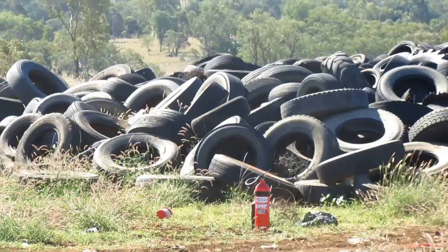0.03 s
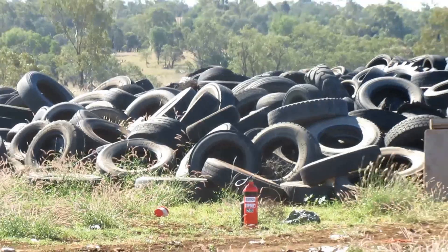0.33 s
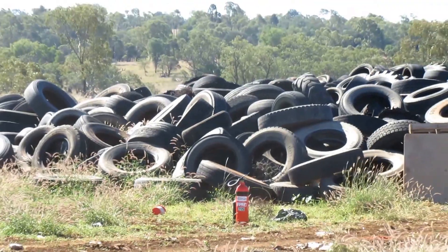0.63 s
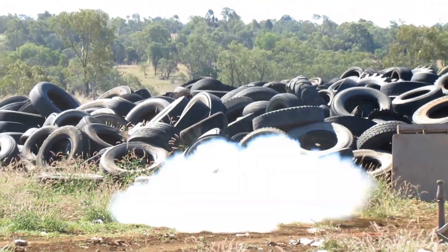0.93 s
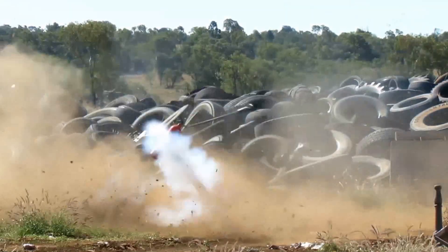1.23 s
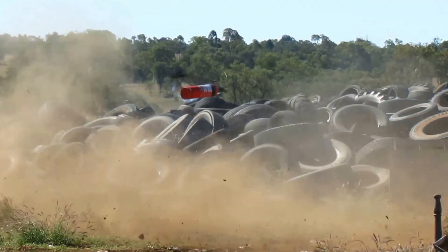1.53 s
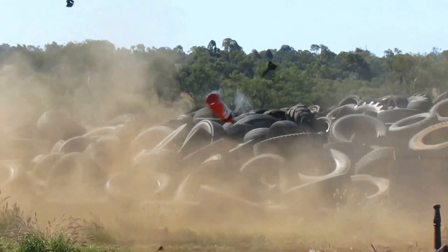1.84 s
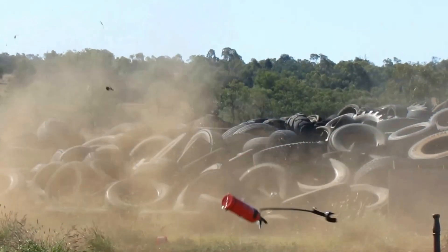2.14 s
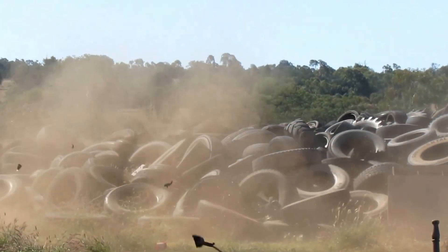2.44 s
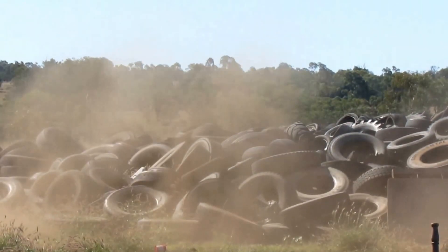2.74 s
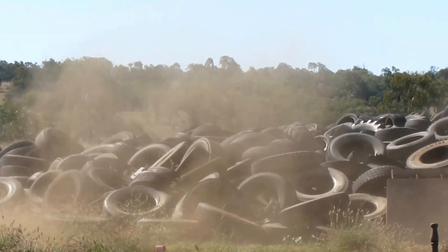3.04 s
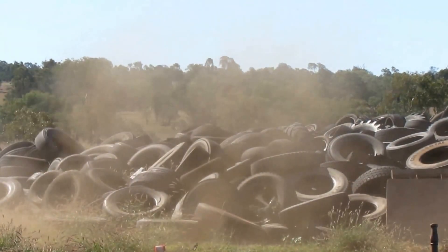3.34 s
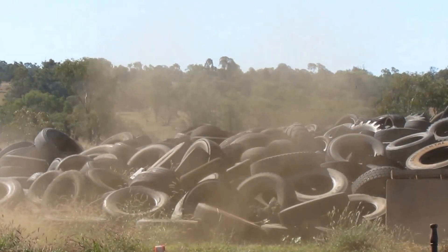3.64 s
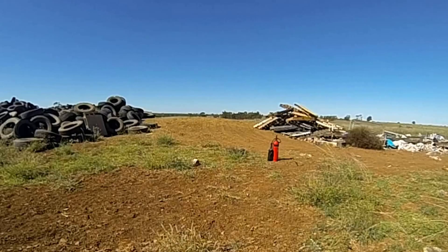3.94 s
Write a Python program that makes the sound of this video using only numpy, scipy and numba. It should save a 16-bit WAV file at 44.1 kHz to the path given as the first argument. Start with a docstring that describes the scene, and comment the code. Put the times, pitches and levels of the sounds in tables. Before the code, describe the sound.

A rifle cracks close to the microphone in an open field, over a small chugging engine. A distant fire extinguisher bursts, hisses in surges and clinks, and debris thuds down. Everything cuts off, leaving faint wind.

```python
"""Rifle shot bursts a fire extinguisher

A rifle cracks up close while a small single-cylinder engine chugs off to the right. The distant
extinguisher bursts, tumbles through the air on its hissing jet and clinks; debris thuds down.
The shot overloads the microphone and ducks its gain control, which recovers slowly.
Everything stops dead, and after a short silence there is only faint wind."""
import sys
import numpy as np
from scipy import signal
from scipy.fft import rfft, irfft
from scipy.io import wavfile
from numba import njit

SR = 44100
rng = np.random.default_rng(int(sys.argv[2]) if len(sys.argv) > 2 else 0)


def log_audio(samples):
    """Write samples as a 16-bit WAV file to the path given in sys.argv[1]."""
    # one column per channel
    frames = np.atleast_2d(samples).T
    # limit to full scale, then quantise
    limited = np.clip(frames, -1, 1)
    pcm = np.round(limited * 32767).astype(np.int16)
    wavfile.write(sys.argv[1], SR, pcm)


N = 176400
T = np.arange(N) / SR
HZ = np.maximum(np.fft.rfftfreq(N, 1 / SR), 1)
CYCLE_HZ = 25.52  # the engine's four-stroke cycles per second
SHOT_S = .9285


def undb(db):
    """Decibels to gain."""
    return 10 ** (np.asarray(db) / 20)


def unit(x):
    """Scale to rms 1."""
    return x / np.sqrt(np.mean(x ** 2))


def pan(db):
    """Left and right gains for a level difference; positive leans left."""
    return undb(np.array([db, -db]) / 2).reshape(2, -1)


def colour(points):
    """An EQ curve through (f/Hz, level/dB) points."""
    hz, db = np.array(points, float).T
    return undb(np.interp(np.log(HZ), np.log(hz), db))


def band(points):
    """An EQ curve that falls away steeply beyond its ends."""
    return colour(points) * np.minimum(1, np.minimum(HZ / points[0][0], points[-1][0] / HZ)) ** 4


def noise(spectrum, side):
    """Stereo noise of rms 1; the side gain sets its width."""
    mid, spread = rfft(rng.standard_normal((2, N)))
    return unit(irfft(spectrum * (mid + side * spread * np.array([[1], [-1]])), N))


def walk(hz):
    """Smooth random motion of rms 1, rolling off above hz."""
    return unit(irfft(rfft(rng.standard_normal(N)) * np.exp(-(HZ / hz) ** 2), N))


def decay(start, t60, hold=0):
    """Sudden onset, hold, then a fall of 60 dB in t60 seconds."""
    return (T >= start) * 1000. ** (-np.maximum(T - start - hold, 0) / t60)


def wave(start, hz, t60):
    """A strongly damped pressure oscillation."""
    return decay(start, t60) * np.sin(2 * np.pi * hz * (T - start))


def wind():
    """Faint air with one low gust on the microphone."""
    # spectra of the air and the gust: f/Hz, level/dB
    air_eq = [(20, -13), (40, -10), (70, -9), (350, -12), (700, -23), (1300, -29), (1450, -21), (1600, -27),
              (1850, -29), (2100, -51)]
    gust_eq = [(20, 9), (32, 0), (50, -17)]
    gust_s, gust_width_s = 3.85, .06
    swell = np.exp(-((T - gust_s) / gust_width_s) ** 2)
    gust = undb(-50) * swell * noise(band(gust_eq), side=undb(-27))
    return gust + undb(-61) * noise(band(air_eq), side=undb(-26))


def throb():
    """A short upward swoop in the engine's drone, once every fourth cycle."""
    first_s, width_s, centre_hz, rise_hz_per_s = .143, .03, 200, 1300
    period = 4 / CYCLE_HZ
    from_peak = (T - first_s + period / 2) % period - period / 2
    phase = 2 * np.pi * (centre_hz + rise_hz_per_s * from_peak / 2) * from_peak
    return undb(-30) * np.exp(-(from_peak / width_s) ** 2) * np.cos(phase)


def engine():
    """Exhaust drone, with clatter and ringing covers that swell at each firing; off to the right."""
    # exhaust harmonics: multiple of the cycle rate, level/dB
    harmonics = [(1, -13), (2, 0), (3, -12), (4, -14), (5, -8.5), (6, -8), (7, -15.5), (8, -14), (9, -21.5),
                 (10, -16), (11, -12), (12, -12), (13, -11), (14, -23), (15, -28), (16, -17.5), (17, -19.5),
                 (18, -25), (19, -17), (20, -19.5), (21, -23), (22, -22.5), (23, -13.5), (24, -21),
                 (25, -13), (26, -21), (27, -19.5), (28, -19.5)]
    # mechanical noise spectrum: f/Hz, level/dB
    clatter_eq = [(41, -33.5), (70, -3.5), (96, -5), (138, -7.5), (284, -7), (373, -17), (599, -10),
                  (840, -13), (1350, -15.5), (2030, -14.5), (2600, -18.5), (4580, -23), (6000, -32.5),
                  (8420, -34.5), (15500, -47)]
    # cover resonances: f/Hz, bandwidth/Hz, level/dB
    cover_modes = [(613, 17, 1.5), (1612, 35, -2), (2041, 66, -0.5)]
    # stereo width: f/Hz, side level/dB
    width = [(60, -16), (600, -28), (1400, 2), (3000, -5), (15000, 6)]
    # stereo position: f/Hz, left minus right/dB
    balance = [(60, -7), (200, -5), (600, -3), (1300, 1), (4400, -1), (15000, 0.5)]
    firing_s, depth, sharpness, crossover_hz, left_lag_s = .0131, 1.44, 1.9, 1204, .00018
    turn = 2 * np.pi * (CYCLE_HZ * (T - firing_s) + .0066 * walk(6))
    drone = unit(sum(undb(db) * np.cos(k * turn + (k > 2) * rng.uniform(0, 2 * np.pi))
                     for k, db in harmonics))
    strength = undb(3 * walk(33))  # no two firings hit alike
    pulse = unit(1 + depth * strength * np.exp(sharpness * (np.cos(turn) - 1)))
    clatter = noise(band(clatter_eq), colour(width))
    lows = irfft(rfft(clatter) / (1 + (HZ / crossover_hz) ** 2), N)
    clatter = lows + pulse * (clatter - lows)  # only the top end pulses
    resonances = sum(undb(db) / (1 + (2 * (HZ - hz) / bw) ** 2) for hz, bw, db in cover_modes)
    rattle = pulse * noise(resonances, colour(width))
    sound = undb(-27) * drone + throb() + undb(-27.5) * clatter + undb(-36.5) * rattle
    lean = np.sqrt(colour(balance))
    lag = np.exp(-2j * np.pi * HZ * left_lag_s)
    return irfft(rfft(sound) * np.array([lean * lag, 1 / lean]), N)


def debris():
    """Dull thuds of pieces landing on earth and rubber."""
    # landings: t/s, level/dB
    landings = [(2.275, -21), (2.891, -21), (2.96, -23.5)]
    # thud spectrum: f/Hz, level/dB
    thud_eq = [(25, -24), (110, -3.5), (250, -21), (800, -45), (3000, -39)]
    return noise(band(thud_eq), side=undb(3)) * sum(undb(db) * decay(s, t60=.26) for s, db in landings)


def clink():
    """Steel chatters against something hard, then rings on faintly."""
    # steel modes: f/Hz, level/dB, left minus right/dB, after-ring t60/s
    modes = [(1209, -1, 1.5, 0.49), (2445, -2.5, -8, 0.056), (2490, -8, -3, 0.15), (2710, -8, -7, 0.13),
             (3203, -3, -5, 0.21), (3237, -16, 1, 0.082), (4340, -17, -4, 0.061), (5100, -15.5, 6, 0.056),
             (5370, -8, 9, .05), (5700, -15, 14.5, .05), (5910, -12.5, 17, .05), (6020, -11, 8, .05),
             (8300, -22, 0, .04), (11800, -23, 3.5, .04)]
    hit_s, attack_s, roughness = 1.7165, .0012, .5
    chatter = decay(hit_s, t60=.03, hold=.024)
    scrape = undb(-26) * chatter * noise(band([(1000, -2), (12000, -5)]), side=undb(-2))
    ring = 0
    for hz, db, pan_db, t60 in modes:
        envelope = chatter * (1 + roughness * walk(91)) + undb(-7) * decay(hit_s, t60)
        phase = 2 * np.pi * hz * (T - hit_s) + roughness * hz / 3000 * walk(100)
        ring += undb(db - 10) * pan(pan_db) * envelope * np.sin(phase)
    return (scrape + ring) * np.clip((T - hit_s) / attack_s, 0, 1)


def jet():
    """Turbulent gas roars and hisses, surging whenever the tumbling bottle's nozzle swings this way."""
    # nozzle swings: t/s, flow level/dB, roar trim/dB
    swings = [(1.1, -30, -9), (1.124, -28.5, -13), (1.152, -23, -4.5), (1.216, -31, -8), (1.26, -33, -7),
              (1.296, -20.5, -1.5), (1.364, -36, -7.5), (1.38, -29.5, -7.5), (1.412, -36, 1),
              (1.468, -36, -10.5), (1.518, -26, -4), (1.572, -40, -7.5), (1.636, -62, -3), (1.66, -66, 4)]
    # spectra of the low roar and the high hiss: f/Hz, level/dB
    roar_eq = [(290, -19), (500, -6.5), (702, -17.5), (786, -11), (1780, 0), (3190, -4.5), (4000, -12),
               (5200, -21), (8800, -120)]
    hiss_eq = [(2060, -21), (3500, 1), (3870, -12), (4630, -7.5), (5720, 1.5), (6610, -6.5), (8580, -5),
               (10800, -11.5), (13200, -20), (15500, -37)]
    # stereo width: f/Hz, side level/dB
    width = [(60, -9), (110, -11), (200, -13), (380, -11), (700, -16), (1290, -18), (2380, -7),
             (4400, -2.5), (8120, -7.5), (15000, -10)]
    times, flow_db, trim_db = np.array(swings).T
    fade = np.interp(T, [times[0] - .015, times[0], times[-1], times[-1] + .03], [0, 1, 1, 0])
    flow = fade * undb(np.interp(T, times, flow_db) + .96 * walk(60))
    roar = undb(27.5 + np.interp(T, times, trim_db)) * noise(band(roar_eq), colour(width))
    hiss = undb(23.5) * noise(band(hiss_eq), colour(width))
    return flow * (roar + hiss)


def burst():
    """The bottle tears open with a low pressure wave that rumbles back from a heap of tyres."""
    # spectra of the torn wavefront and the rumble: f/Hz, level/dB
    tear_eq = [(100, -13), (500, 3), (1200, -14), (2000, -7.5), (4500, -26), (8000, -15.5), (11000, -27),
               (15000, -38)]
    rumble_eq = [(40, -6), (140, 1), (300, -5), (600, -9), (1200, -25.5), (3000, -37)]
    tear_s, burst_s, low_cut_hz = 1.083, 1.0845, 60.3
    pressure = undb(23.5) * wave(burst_s, hz=141, t60=.028)
    thump = signal.sosfilt(signal.butter(2, low_cut_hz, "high", fs=SR, output="sos"), pressure)
    tear = undb(12.5) * decay(tear_s, t60=.037) * noise(band(tear_eq), side=undb(-6.5))
    rumble = undb(-.5) * decay(burst_s, t60=.84) * noise(band(rumble_eq), side=undb(-14.5))
    return thump + tear + rumble


def scatter():
    """The shot scatters back from grass and tyres as a swelling sizzle."""
    # sizzle spectrum: f/Hz, level/dB
    sizzle_eq = [(900, -10), (2500, -4), (6000, -2), (9500, -7), (15500, -24.5)]
    peak_s, rise_t60, fall_t60 = 1.04, .6, .14
    away = np.maximum((peak_s - T) / rise_t60, (T - peak_s) / fall_t60)
    swell = (T > SHOT_S) * 1000. ** -away
    return undb(-9) * swell * noise(band(sizzle_eq), side=undb(-4))


def rifle():
    """Muzzle wave, crack with its near reflections, boom off the ground and a dull tail over the field."""
    # bursts from the muzzle and nearby surfaces: t/s, level/dB, t60/s
    cracks = [(0.9304, 16.5, 0.052), (.946, 14, .06), (.953, 17, 0.063), (1.0235, 9, 0.011)]
    # spectra of the crack and the boom: f/Hz, level/dB
    crack_eq = [(120, -24), (200, -5.5), (585, -1.5), (702, 5), (974, -7.5), (2470, -13), (3300, -11),
                (5800, -12), (6960, -15), (15500, -27.5)]
    boom_eq = [(40, -16), (200, -7), (550, -13), (1000, -12.5), (2500, -19)]
    # stereo width of the crack: f/Hz, side level/dB
    width = [(60, -1), (110, -1), (200, -8), (380, 0), (700, 0.5), (1290, -3), (2380, 1), (4400, -6),
             (8120, 0), (15000, 4.5)]
    boom_s = .9355
    muzzle = -undb(-1) * wave(SHOT_S, hz=515, t60=.012)
    hits = sum(undb(db) * decay(s, t60) for s, db, t60 in cracks)
    crack = hits * noise(band(crack_eq), colour(width))
    ground = undb(9.5) * decay(boom_s, t60=.11)
    field = undb(-.5) * decay(boom_s, t60=.47)
    boom = (ground + field) * noise(band(boom_eq), side=undb(-8))
    return muzzle * pan(-5.5) + crack * pan(-1.5) + boom * pan(-4.5)


def scene():
    """The shooting range, a short silence, then wind."""
    start_s, stop_s, wind_s = .068, 3.541, 3.735
    action = engine() + rifle() + scatter() + burst() + jet() + clink() + debris()
    return action * ((T > start_s) & (T < stop_s)) + wind() * (T > wind_s)


@njit
def duck(excess_db, attack_s, hold_s, release_s):
    """Gain reduction in dB: grabs the excess level quickly and lets go in two slow stages."""
    out, peak, reduction = np.empty(len(excess_db)), 0., 0.
    for i in range(len(excess_db)):
        if excess_db[i] > peak:
            peak += (excess_db[i] - peak) / (attack_s * SR)
        else:
            peak -= peak / (hold_s * SR)
        reduction = max(peak, reduction + (peak - reduction) / (release_s * SR))
        out[i] = reduction
    return out


def record(dry):
    """The microphone overloads, the gain control ducks, the first peaks clip and the top is cut."""
    overload_db, threshold_db, top_hz = 24.5, -8.5, 15800
    mic = undb(overload_db) * np.tanh(dry / undb(overload_db))
    excess_db = 20 * np.log10(np.abs(mic).max(axis=0) + 1e-9) - threshold_db
    gain = undb(-duck(excess_db, attack_s=.0017, hold_s=.54, release_s=.53))
    clipped = np.clip(mic * gain, -1, 1)
    return signal.sosfilt(signal.ellip(8, .2, 70, top_hz, fs=SR, output="sos"), clipped)


dry = scene()
out = record(dry)
log_audio(out)
```